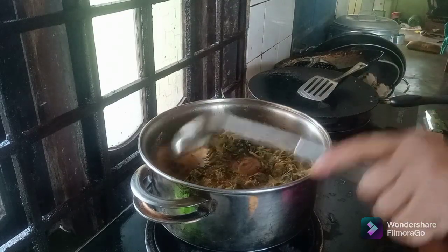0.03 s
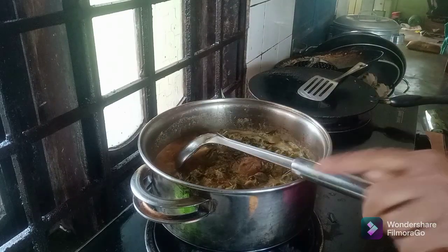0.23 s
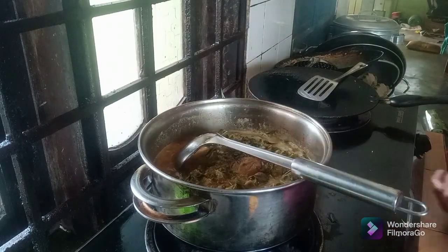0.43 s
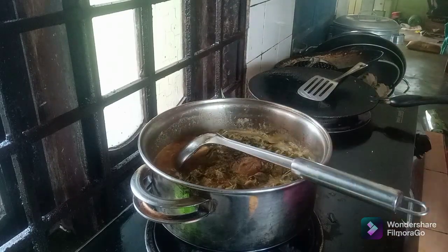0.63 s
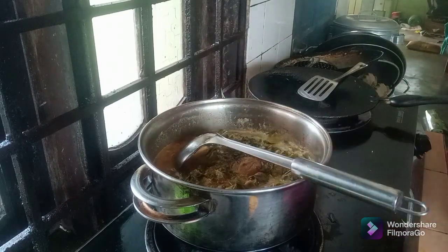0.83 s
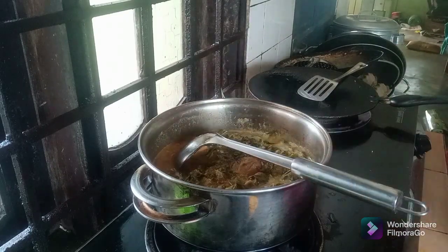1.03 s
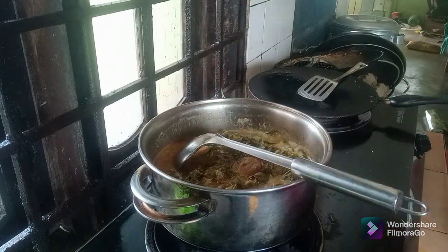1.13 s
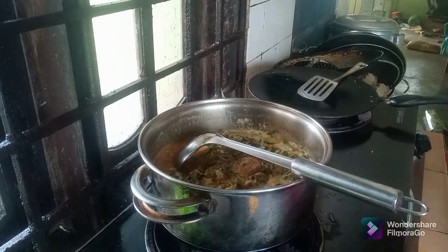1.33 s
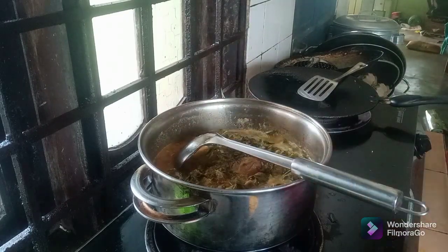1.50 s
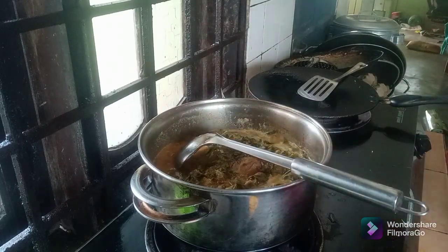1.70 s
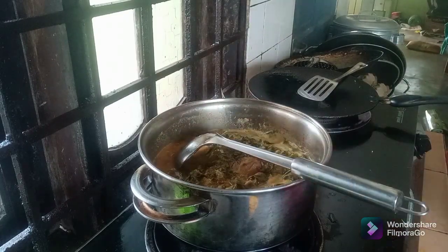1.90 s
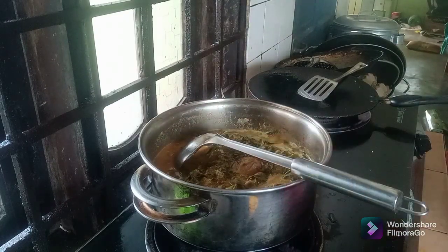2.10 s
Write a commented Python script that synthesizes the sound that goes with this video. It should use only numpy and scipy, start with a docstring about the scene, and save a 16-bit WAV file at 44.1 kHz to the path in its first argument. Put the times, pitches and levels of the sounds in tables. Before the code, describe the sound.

After a faint scrape, a steel ladle knocks loudly against a steel pot at 0.2 seconds, then drops onto the rim with bright clinks at 0.3 and 0.5. Thick curry then plops and sputters softly, with a squelch ending in a tiny whistle around 1.5. The ladle ticks lightly on the rim between 1.4 and 2 seconds. A small kitchen echoes briefly over a faint low hum.

```python
"""First comes a short scrape and a loud knock: a steel ladle ends its stir and hits a steel pot.
It drops onto the rim, where it later shifts with light clinks. Thick curry simmers in the pot:
bubbles plop, steam sputters, and one long squelch ends in a thin whistle.
A small kitchen with hard walls rings after each sound, over a low hum."""
import sys
import numpy as np
from scipy import signal
from scipy.fft import rfft, irfft, next_fast_len
from scipy.io import wavfile
from scipy.ndimage import uniform_filter1d, map_coordinates

SR = 44100
rng = np.random.default_rng(int(sys.argv[2]) if len(sys.argv) > 2 else 0)


def file_out(sig):
    """Save sig as 16-bit WAV at sys.argv[1]."""
    # one column per channel
    cols = np.atleast_2d(sig).T
    # limit, then scale
    lim = np.clip(cols, -1, 1)
    pcm = np.round(lim * 32767).astype(np.int16)
    wavfile.write(sys.argv[1], SR, pcm)


N = 94815

# The pot's ringing notes. Each row: pitch in Hz, relative level in dB, seconds to fade by 60 dB.
POT_NOTES = [(360, -14, .06), (690, -23, .05), (805, -12, .05), (1242, -19, .25), (1345, -16, .09),
             (1600, -20, .16), (1480, -2, .06), (1740, -19, .12), (2300, -16, .04), (2410, -11, .05),
             (2645, -15, .04), (4770, -17, .13), (6715, -18, .2), (7500, -14, .12)]
# The tone of the crash and of the thud. Each row: frequency in Hz, relative level in dB.
CRASH_TONE = [(100, -29), (220, -28), (350, -12), (500, -17.5), (800, -6.5), (1000, -6.5), (1500, 0),
              (1950, -9), (2450, -3), (3400, -17), (4200, -9), (4550, -12), (4900, -3.5), (5900, -6),
              (6350, -21), (6700, -8.5), (7500, -13), (8050, -18.5), (9000, -18), (11500, -20),
              (13500, -42), (15200, -28)]
THUD_TONE = [(30, -30), (60, -11), (92, -3.5), (130, -10), (195, -24), (250, -16), (500, -38),
             (1500, -63.5)]
# Blows on the pot. Each row: start in seconds, then ring, crash and thud levels in dB.
KNOCKS = [(.2045, -11.5, -11, -37.5)]
def knock():
    """The ladle hits the full pot: a short ring, a crash of many overtones and a thud in the stove."""
    sound = 0
    for start, ring_db, crash_db, thud_db in KNOCKS:
        sound += amp(ring_db) * ring(POT_NOTES, start, attack=.00063)
        crack = 1.8 * struck(start, attack=.0012, fade=.024)
        tail = .34 * struck(start, attack=.002, fade=.12)
        sound += amp(crash_db) * noise(CRASH_TONE) * (crack + tail)
        sound += amp(thud_db) * noise(THUD_TONE) * struck(start + .01, attack=.0094, fade=.79)
    return sound

# Notes of the ladle's stem and handle. Each row: pitch in Hz, relative level in dB, fade in seconds.
STEM_NOTES = [(1777, -15, .16), (2173, -13, .05), (3057, -26, .25), (4436, -23, .08), (5155, -8, .06),
              (6085, -18, .1), (7200, 4, .05), (7206, -18, .24), (7495, -19, .1), (9125, -15, .04),
              (11300, -8, .035), (14550, -25, .06), (15340, -16, .06)]
HANDLE_NOTES = [(2498, 0.5, 0.089), (3608, -1.5, 0.11), (4360, -7.5, 0.036), (4840, -1, 0.076),
                (6150, -9, .07), (6970, -10.5, 0.073), (7450, -11.5, 0.2), (9000, -11.5, 0.093),
                (9500, -13.5, 0.061), (14350, -9, .04), (15300, -9, 0.093)]
# The tone of their clicks. Each row: frequency in Hz, relative level in dB.
DROP_TONE = [(600, -12.5), (1800, 2.5), (3600, -10.5), (6000, -3.5), (8000, -20.5), (11300, -5.5),
             (13000, -17), (15300, -7)]
TAP_TONE = [(1000, -5), (2500, -0.5), (4700, -7), (7000, -7.5), (12000, -8.5), (15300, -10)]
# Hits on the rim. Each row: start in seconds, ring level in dB, click level in dB,
# centre frequency in Hz, dB lost per octave away from it.
STEM_DROPS = [(.3112, -11.5, -21.5, 7200, -0.5), (.495, -18.5, -65, 3030, 36), (.526, -34, -67, 4940, 50)]
HANDLE_TAPS = [(1.397, -35.5, -58, 3800, 14.5), (1.566, -51, -34.5, 2880, 12.5),
               (1.803, -38.5, -63, 4850, 18), (1.9575, -29.5, -34.5, 4200, -1)]
def clinks():
    """The ladle drops onto the rim and settles, then rocks on it now and then."""
    sound = 0
    for start, ring_db, click_db, hz, slope in STEM_DROPS:
        sound += amp(ring_db) * ring(favour(STEM_NOTES, hz, slope), start, attack=.0019)
        sound += amp(click_db) * noise(DROP_TONE) * struck(start, attack=.0005, fade=.0747)
    for start, ring_db, click_db, hz, slope in HANDLE_TAPS:
        sound += amp(ring_db) * ring(favour(HANDLE_NOTES, hz, slope), start, attack=.0025)
        click = noise(favour(TAP_TONE, hz, slope))
        sound += amp(click_db) * click * struck(start, attack=.00059, fade=.056)
    return sound

# The handle's squeak. Each row: pitch in Hz, relative level in dB.
SQUEAK_NOTES = [(3470, 0), (4800, -5)]
def skid():
    """After its last tap, the handle sticks and slips on the steel for an instant."""
    squeak = sum(amp(db) * np.sin(2 * np.pi * hz * since(0) + .4 * wobble(600))
                 for hz, db in SQUEAK_NOTES)
    return amp(-31) * squeak * held(start=2.0028, length=.0052, attack=.001, release=.001)

# The tone of the scrape. Each row: frequency in Hz, relative level in dB.
SCRAPE_TONE = [(100, -4.5), (600, -10.5), (1200, 1), (1750, -0.5), (2300, -12), (3100, -1.5), (4200, -19.5),
               (4800, -9), (5800, -14.5), (6500, -23), (15000, -45.5)]
# Strokes of the ladle. Each row: start in seconds, length in seconds, level in dB.
STROKES = [(0, 0.024, -42.5), (0.191, .011, -46)]
def stir():
    """The ladle scrapes unevenly along the pot's wall."""
    scrape = flicker(bubbly(SCRAPE_TONE), depth_db=2, rate=300)
    return scrape * sum(amp(db) * held(start, length, attack=.003, release=.018)
                        for start, length, db in STROKES)

# The wet tone of the curry. Each row: frequency in Hz, relative level in dB.
WET_TONE = [(100, -11.5), (300, -6), (650, -4), (1000, -6.5), (1500, 0.5), (2000, -8), (3000, -20.5),
            (8000, -65)]
# Large bubbles. Each row: start in seconds, relative level in dB, pitch in Hz.
PLOPS = [(0.515, -33.5, 1780), (.522, -33.5, 1246), (0.609, -44, 1510), (.666, -46, 814), (.766, -40, 690),
         (.781, -38, 1430), (.813, -38, 1590), (.829, -40, 710), (.916, -44, 1490), (1.035, -46, 1400),
         (1.050, -35, 1500), (1.069, -35, 1620), (1.1335, -39, 1466), (1.232, -27.5, 1622),
         (1.397, -25, 1140), (1.421, -24.5, 1006), (1.659, -37.5, 1620), (1.672, -34, 1355),
         (1.75, -40, 937), (1.769, -36.5, 1430), (1.902, -35.5, 1610), (1.976, -24.5, 1213),
         (2.036, -33, 1030), (2.0501, -26, 1535), (2.066, -31, 297), (2.099, -29.5, 1560),
         (2.12, -20.5, 1317)]
SMALL_BUBBLES_PER_SECOND, SMALL_BUBBLE_HZ = 110, 860
def plops():
    """Large bubbles burst with a wet snap, among many faint ones."""
    wet = noise(WET_TONE)
    sound = 0
    for start, db, hz in PLOPS:
        snap = amp(-15.5) * wet * struck(start, attack=.00039, fade=.034)
        sound += amp(db + 3.5) * (bubble(start, hz, attack=.0016, fade=.024) + snap)
    count = int(SMALL_BUBBLES_PER_SECOND * N / SR)
    for when, size, pitch in rng.random((count, 3)):
        hz = SMALL_BUBBLE_HZ * 2 ** (3 * (pitch - .5))  # spread over three octaves
        sound += amp(-75.5 + 14 * size) * bubble(when * N / SR, hz, attack=.001, fade=.02)
    return sound

def bubble(start, hz, attack, fade):
    """A very short note whose pitch rises as the bubble opens."""
    t = since(start)
    rise = 1 + 4 * (np.minimum(t, fade) - fade / 2)
    return struck(start, attack, fade) * np.sin(2 * np.pi * hz * t * rise)

# The tone of fizzing steam. Each row: frequency in Hz, relative level in dB.
FIZZ_TONE = [(800, -8.5), (2000, -3), (3000, 3.5), (3900, -2), (5500, -2), (7000, -18.5), (10000, -22.5),
             (15500, -35)]
# Spurts of steam. Each row: start in seconds, length in seconds, wet level in dB, fizz level in dB.
SPURTS = [(0.623, 0.036, -52.5, -62), (0.847, .08, -54.5, -62), (1.036, 0.04, -47, -58.5),
          (1.232, 0.027, -52, -61), (1.329, 0.057, -62, -54), (1.568, 0.012, -46.5, -45.5),
          (1.656, 0.043, -46, -74), (1.738, 0.054, -52.5, -75), (1.844, 0.077, -49.5, -62.5),
          (1.982, 0.067, -46.5, -48.5), (2.049, 0.097, -46, -52)]
# Dull heaves of the curry. Each row: start in seconds, level in dB.
HEAVES = [(0, -46.5), (.95, -49.5), (1.19, -51.5), (1.435, -43.5), (1.965, -46.5), (2.055, -45.5)]
def sputters():
    """Steam escapes in wet, crackling spurts, and the thick curry heaves."""
    wet = flicker(bubbly(WET_TONE), depth_db=1.6, rate=200)
    fizz = flicker(bubbly(FIZZ_TONE), depth_db=1.6, rate=300)
    spurts = sum((amp(wet_db) * wet + amp(fizz_db) * fizz)
                 * held(start, length, attack=.0034, release=.006)
                 for start, length, wet_db, fizz_db in SPURTS)
    heaves = sum(amp(db) * struck(start, attack=.012, fade=.38) for start, db in HEAVES)
    return spurts + noise(THUD_TONE) * heaves

# The tone of the squelch. Each row: frequency in Hz, relative level in dB.
SQUELCH_TONE = [(88, -48), (150, -22.5), (408, -13.5), (478, -21.5), (551, -7.5), (1300, -2.5), (1990, -15),
                (2250, -16), (3740, -24.5), (4300, -31), (4950, -28), (10000, -58), (13000, -85),
                (22000, -120)]
WHISTLE_START, WHISTLE_HZ, RISE_HZ_PER_SECOND = 1.475, 1365, 1100
def squelch():
    """A pocket of steam blubbers out, then whistles hoarsely through the narrowing hole."""
    blubber = flicker(bubbly(SQUELCH_TONE), depth_db=1.35, rate=250)
    blubber *= held(start=1.396, length=.053, attack=.0041, release=.021)
    hz = (WHISTLE_HZ + RISE_HZ_PER_SECOND * since(WHISTLE_START)) * (1 + .035 * wobble(600))
    phase = 2 * np.pi * np.cumsum(hz) / SR
    note = flicker(np.sin(phase) + amp(-20) * np.sin(2 * phase), depth_db=2, rate=200)
    rasp = amp(-7) * noise(SQUELCH_TONE) + amp(-18) * bubbly(FIZZ_TONE)
    whistle = (note + rasp) * held(WHISTLE_START, length=.046, attack=.0032, release=.0073)
    return amp(-34.5) * blubber + amp(-37.5) * whistle

# The tone of the sizzle. Each row: frequency in Hz, relative level in dB.
SIZZLE_TONE = [(2000, -20), (4500, 0), (7000, -7), (9500, -10), (12500, -19), (15500, -20)]
def sizzle():
    """Curry splashed on the hot wall spits faintly around the long squelch."""
    spit = flicker(bubbly(SIZZLE_TONE), depth_db=2, rate=300)
    return amp(-67) * spit * held(start=1.345, length=.19, attack=.01, release=.015)

# How long the room rings. Each row: frequency in Hz, seconds to fade by 60 dB.
ECHO_FADES = [(100, .85), (500, .6), (1500, .66), (5000, .62), (7500, .53), (11000, .38), (15000, .31)]
# The tone of its echo. Each row: frequency in Hz, relative level in dB.
ECHO_TONE = [(100, -2), (600, -1.5), (1500, -0.5), (3000, -6), (5500, -2), (10000, 0.5), (15000, -4)]
def kitchen_echo(sound):
    """Hard walls throw the sound back, and each frequency dies away at its own speed."""
    hz, t, bands = signal.stft(rng.standard_normal(SR), SR, nperseg=256)
    bands = bands * amp(-60 * t / along(ECHO_FADES, hz)[:, None])
    strength = np.linalg.norm(signal.istft(bands, SR, nperseg=256)[1])
    tail = signal.istft(bands * amp(along(ECHO_TONE, hz))[:, None], SR, nperseg=256)[1] / strength
    build_up = 1 - np.exp(-np.arange(len(tail)) / SR / .0027)
    return signal.fftconvolve(sound, tail * build_up)[:N]

# The low hum. Each row: pitch in Hz, level in dB.
HUM_NOTES = [(98, -65), (167, -68), (248, -70)]
# The singing steel. Each row: centre frequency in Hz, width in Hz, level in dB.
STEEL_BANDS = [(1801, 33, -67.5), (3090, 130, -73), (5835, 190, -73.5), (11430, 400, -86)]
# The tone of the room noise. Each row: frequency in Hz, relative level in dB.
ROOM_TONE = [(15, -47.5), (25, -20), (92, 4), (206, -9.5), (439, -6), (641, -2), (1160, -10.5), (1560, -11),
             (2000, -15), (3430, -16.5), (4370, -26), (5730, -20.5), (8140, -32), (14800, -38.5),
             (16000, -46)]
def background():
    """A wavering hum, steel set faintly singing by the simmer, and soft room noise."""
    sound = 0
    for hz, db in HUM_NOTES:
        hum = np.sin(2 * np.pi * hz * since(0) + .6 * wobble(6))
        sound += amp(db) * flicker(hum, depth_db=2.5, rate=10)
    for hz, width, db in STEEL_BANDS:
        steel = filtered(rng.standard_normal(N), lambda f: 1 / (1 + ((f - hz) / width * 2) ** 2))
        sound += amp(db) * unit(steel)
    return sound + amp(-58) * noise(ROOM_TONE)

def ring(notes, start, attack):
    """Struck steel rings with all its notes at once, roughened by the loose contact."""
    sound = 0
    for hz, db, fade in notes:
        loudness = amp(db + .5 * rng.normal()) * struck(start, attack, fade)
        phase = 2 * np.pi * (hz * since(start) + rng.random())
        sound += loudness * np.sin(phase + .45 * wobble(110))
    return sound

def favour(rows, hz, slope_db):
    """The spot that is hit favours notes near one frequency (far from it if the slope is negative)."""
    return [(f, db - slope_db * abs(np.log2(f / hz)), *rest) for f, db, *rest in rows]

def bubbly(tone):
    """Noise broken into brief ringing patches, as if by many tiny air pockets."""
    bands = signal.stft(noise(tone), nperseg=256)[2]
    patches = uniform_filter1d(rng.standard_normal(bands.shape), size=2, axis=0)
    patches = uniform_filter1d(patches, size=4, axis=1)
    return unit(signal.istft(bands * amp(4.5 * unit(patches)), nperseg=256)[1][:N])

def noise(tone):
    """Steady noise shaped by a tone table."""
    return unit(filtered(rng.standard_normal(N), lambda hz: amp(along(tone, hz))))

def struck(start, attack, fade):
    """The loudness of a blow: a quick rise, then a fall of 60 dB every `fade` seconds."""
    t = since(start)
    return (1 - np.exp(-t / attack)) * amp(-60 * t / fade)

def held(start, length, attack, release):
    """Loudness that rises, holds and dies away; all times are in seconds."""
    return (1 - np.exp(-since(start) / attack)) * np.exp(-since(start + length) / release)

def flicker(sound, depth_db, rate):
    """Make the loudness waver at random, at an overall level of 1."""
    return unit(sound * amp(depth_db * wobble(rate)))

def wobble(rate):
    """A smooth curve through `rate` random points a second."""
    return map_coordinates(rng.standard_normal(N // 8), [np.arange(N) * rate / SR], mode="wrap")

def filtered(sound, gain_at):
    """Turn each frequency up or down by its own gain."""
    size = next_fast_len(N + SR // 2)
    return irfft(rfft(sound, size) * gain_at(np.fft.rfftfreq(size, 1 / SR)), size)[:N]

def along(table, hz):
    """Read between a table's rows, with octaves evenly spaced."""
    frequencies, values = np.transpose(table)
    return np.interp(np.log(hz + 1), np.log(frequencies + 1), values)

def since(start):
    """Seconds after a moment, zero before it."""
    return np.maximum(np.arange(N) / SR - start, 0)

def amp(db):
    """Turn decibels into a number to multiply by."""
    return 10 ** (np.asarray(db) / 20)

def unit(sound):
    """Scale to an average (rms) level of 1."""
    return sound / np.sqrt(np.mean(sound ** 2) + 1e-20)

def scene():
    """Ladle, pot and curry, each with its own amount of echo, over the background."""
    layers = [(knock(), -3), (clinks() + skid() + stir(), -7.5),
              (plops() + sputters() + sizzle(), -9.5), (squelch(), -13.5)]
    cooking = sum(sound + amp(echo_db) * kitchen_echo(sound) for sound, echo_db in layers)
    return (cooking + background())[None]

TREBLE_LIMIT_HZ = 15700
def record(dry):
    """Cut away the very highest treble."""
    return filtered(dry[0], lambda hz: 1 / (1 + (hz / TREBLE_LIMIT_HZ) ** 120))[None]

dry = scene()
out = record(dry)
file_out(out)
```